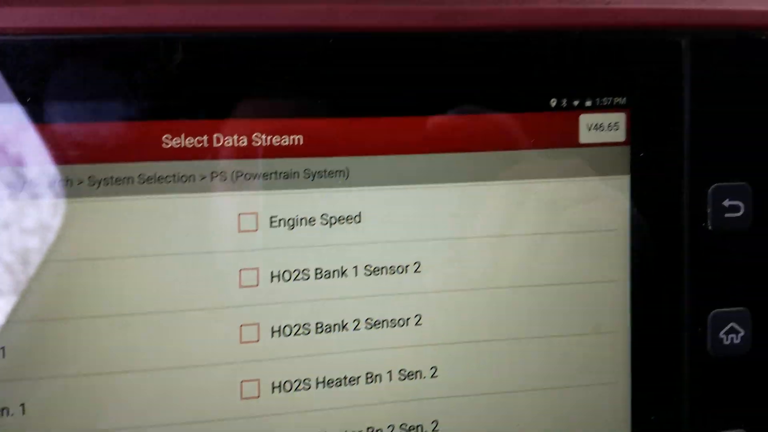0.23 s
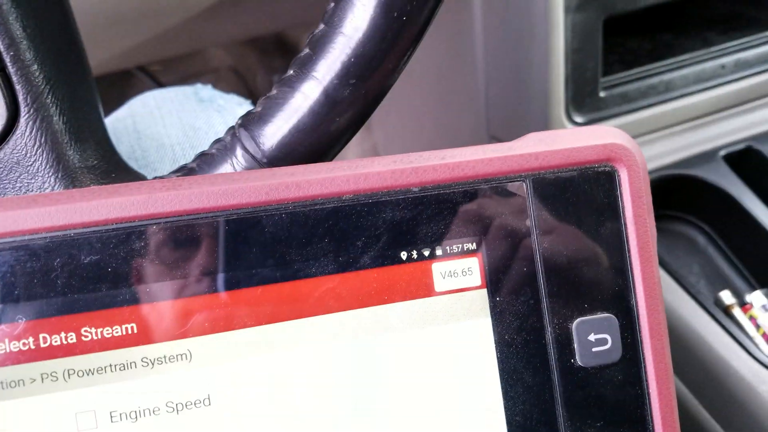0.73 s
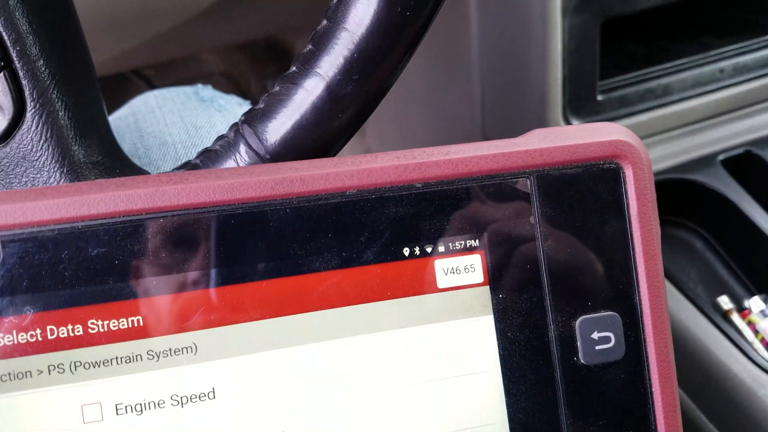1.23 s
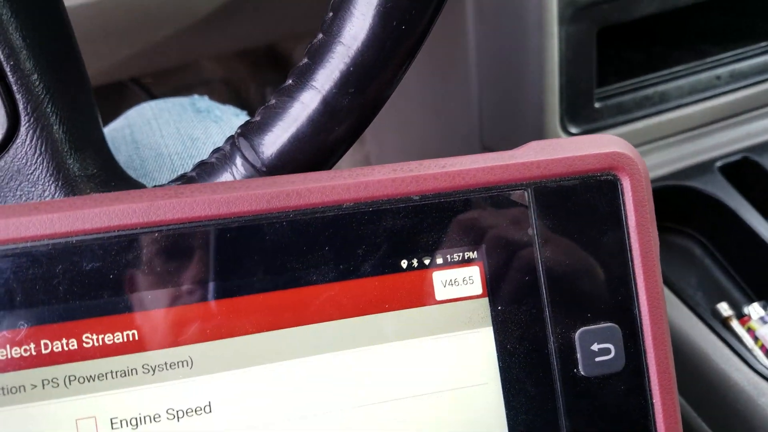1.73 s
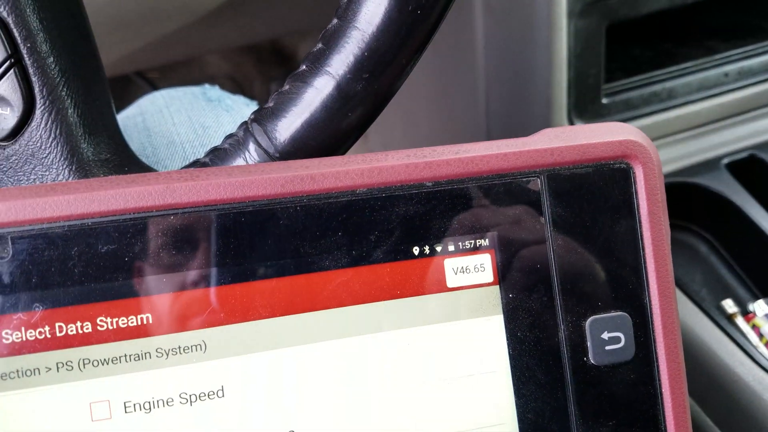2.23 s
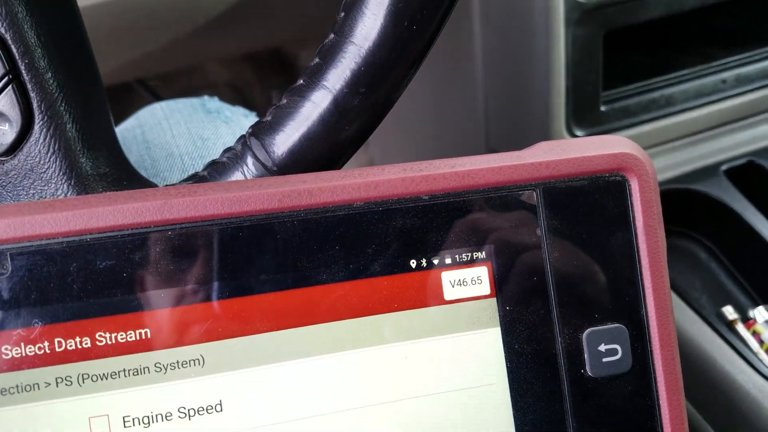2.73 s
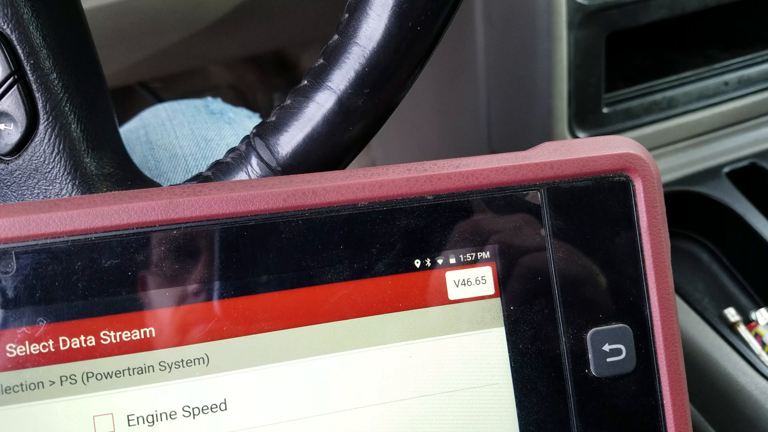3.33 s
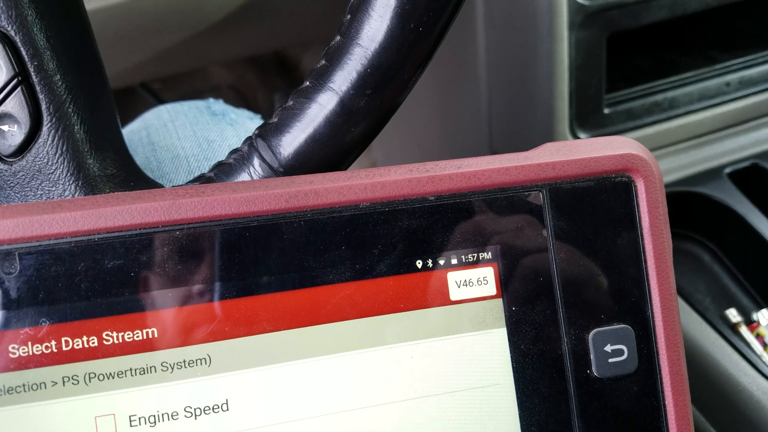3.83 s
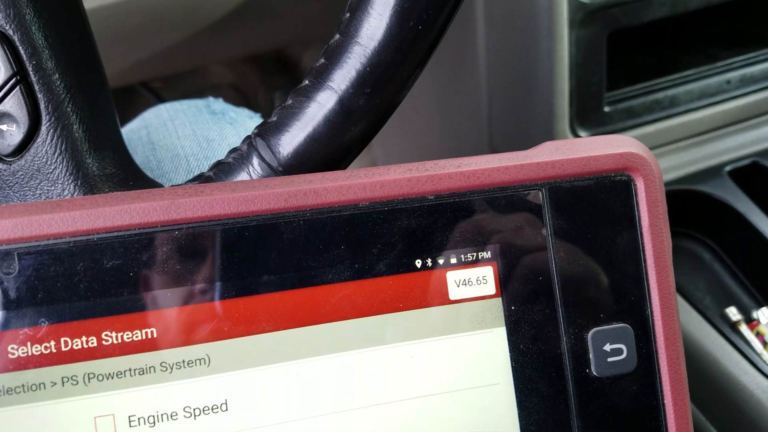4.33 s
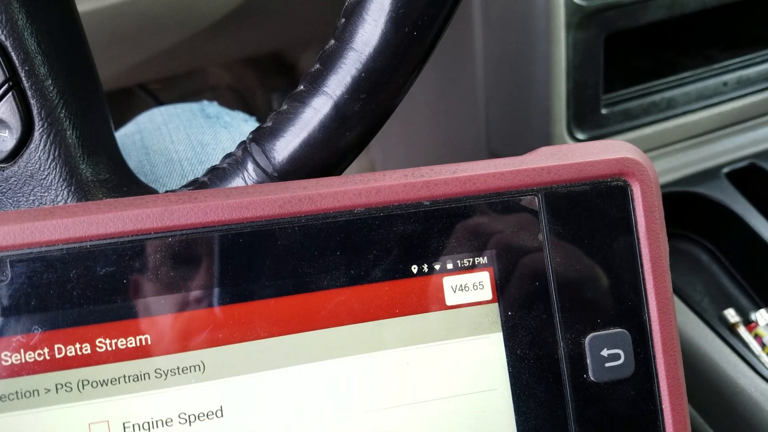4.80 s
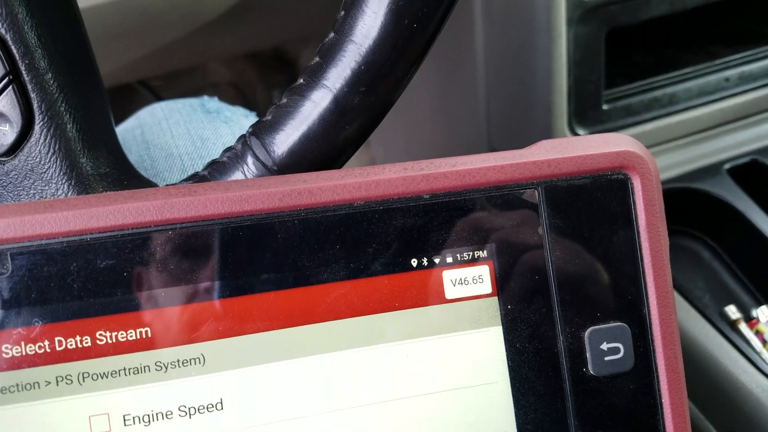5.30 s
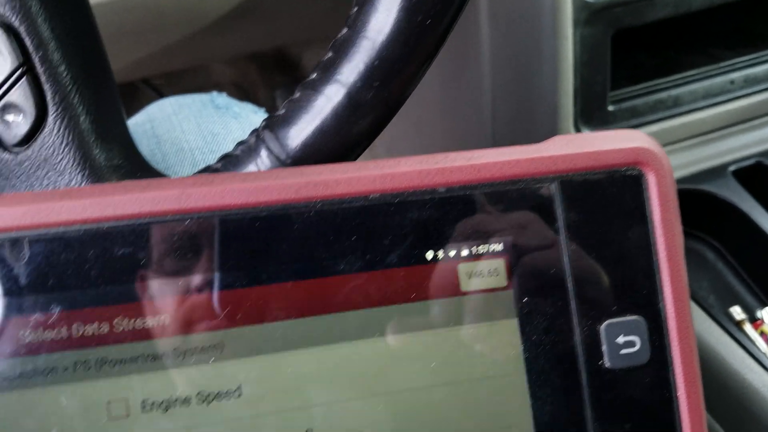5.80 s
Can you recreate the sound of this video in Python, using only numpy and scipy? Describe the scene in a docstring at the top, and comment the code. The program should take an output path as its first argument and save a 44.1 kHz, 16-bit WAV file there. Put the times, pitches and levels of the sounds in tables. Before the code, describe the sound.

A large petrol V8 idles inside a vehicle cab, heard from the driver's seat on a close stereo microphone. It is already running at 0 s, slightly fast, and settles by 0.5 s to about 645 rpm, just over five cycles a second. Unequal firings make a loud, deep, loping boom with irregular shaking, and a dull knock rings the bulkhead each cycle. Far quieter are gritty valve ticks, small metallic pings, block taps, belt whirr and rhythmic puffs of hiss. A loose panel drones briefly near 0.2, 0.55, 1.3, 2.5, 2.9 and 3.8-4.1 s, strongly at 4.5, then 5.6 and 5.9 s. Smooth hiss swells during the first 1.4 s, then at 4.2, 4.6 and 5.3 s. Harder clacks come at 2.2, 3.8, 4.47 (loudest) and 5.1 s. The idle continues to the cut near 6 s.

```python
"""Driver's seat, big petrol V8 at a rough idle near 645 rpm; two microphone ports about 13 cm apart. It opens
faster and settles within half a second; unequal firings boom with a lope, uneven burns shake. Each cycle rings
a dull bulkhead knock and covers, clip and block with grit, over whirr and puffs of hiss. A loose panel drones
from the start, now and then; smooth hiss swells early and again after 4 s. The longest of these swells begins
at 4.6 s, just after the loudest valve clack; the idle runs on to the end."""
import sys
import numpy as np
from scipy import signal
from scipy.fft import rfft, irfft, next_fast_len
from scipy.io import wavfile
from scipy.ndimage import uniform_filter1d, minimum_filter1d

SR = 44100
rng = np.random.default_rng(int(sys.argv[2]) if len(sys.argv) > 2 else 0)


def dump_mix(stems):
    """Bounce the given channels to the path in sys.argv[1] as a 16-bit WAV at rate SR."""
    frames = np.atleast_2d(stems).T  # one column per channel
    limited = np.clip(frames, -1, 1)  # hard clip at full scale
    pcm = np.round(limited * 32767).astype(np.int16)
    wavfile.write(sys.argv[1], SR, pcm)


N = 267157
T = np.arange(N) / SR

# crank speed: time_s, speed_rpm
SPEED = [(0.0, 660.4), (0.5, 639.2), (0.76, 653.0), (1.01, 638.0), (1.26, 647.7), (1.52, 637.7),
         (2.02, 648.0), (3.54, 646.2), (4.04, 653.6), (4.29, 634.9), (4.54, 652.4), (5.3, 642.9),
         (5.56, 652.5), (6.06, 643.0)]

# smooth hiss swelling under the puffs: start_s, length_s, level_db
SWELLS = [(0, 0.36, -53), (0.59, 0.35, -54.5), (1.164, 0.27, -51), (4.2, 0.43, -54), (4.577, 0.59, -49),
          (5.29, 0.37, -46.5)]
SWELL_RISE_S, SWELL_FALL_S, SWELL_FLOOR_DB = .12, .15, -72
# puffs of gas in every cycle: place_in_cycle (0-1), relative_level_db, decay_s of power
PUFFS = [(.17, 9, 0.03), (.3, 15, 0.012), (0.539, 18.5, 0.013), (.925, 19.8, 0.016)]
# slow drift of the puffs: time_s, relative_level_db
PUFF_DRIFT = [(0, -0.57), (.8, 0.23), (1.35, 1), (1.7, -0.97), (2.1, 1.5), (2.8, -0.32), (3.5, -0.7),
              (4.4, -0.21), (6.06, -0.12)]
# spectrum of the hiss: frequency_hz, relative_level_db per Hz
HISS = [(500, 0.5), (1200, 10), (2400, 2), (3500, 6), (4500, 1.5), (6800, -0.5), (7200, -4.5),
        (9000, -10.5), (11300, -1), (13500, -1.5), (16000, -2.5)]

# spectrum of the whirr of belt and gears: frequency_hz, relative_level_db per Hz
WHIRR = [(200, -0.5), (480, 2), (660, -1), (810, 0.5), (950, -0.5), (1300, -2.5), (2000, -9.5),
         (2800, -13.5), (4200, -17), (6600, -21.5), (9000, -30.5), (12000, -24.5), (16000, -24)]
# the lull before the strongest puff: place and width in the cycle (0-1), depth
LULL_PLACE, LULL_WIDTH, LULL_DB = 0.853, 0.087, -2.5
# spectrum of the tapped block: frequency_hz, relative_level_db per Hz
BLOCK = [(300, -19), (520, 1), (600, 8), (660, -6), (720, 12.5), (830, 11), (930, -4.5), (1500, 0),
         (3000, -31), (8000, -30)]
# block taps in every cycle: place_in_cycle (0-1), relative_level_db, decay_s of power
TAPS = [(.54, -0.5, 0.012), (0.8, 4.5, 0.017), (1, 3, 0.0049), (.3, -3.5, 0.04)]
# pings of a small metal part in every cycle: place_in_cycle (0-1), relative_level_db, decay_s of power
PINGS = [(0.57, 6.1, 0.0074), (0.3, 5, 0.015), (0.96, 1.1, 0.0043)]
# modes of that metal part: frequency_hz, width_hz, relative_level_db
METAL = [(3440, 57, 3.5), (3800, 93, 1.5), (4970, 40, 5.5), (5110, 74, -9), (5170, 30, 1), (5640, 160, -7)]
# valve ticks in every cycle: place_in_cycle (0-1), relative_level_db, decay_s of power
TICKS = [(.305, 0.44, 0.0028), (.55, 5.6, 0.0029), (.935, 1.8, 0.0061)]
# how much ticks, pings and taps differ from cycle to cycle
TICK_SPREAD_DB, PING_SPREAD_DB, TAP_SPREAD_DB = 1.7, 1.8, 1.2
# slow drift of the valve ticks: time_s, relative_level_db
TICK_DRIFT = [(0, 3.5), (.2, 7.5), (.5, 0.5), (1.4, 1.5), (1.65, -3), (2.4, 3.5), (3.3, 0), (4.4, 2.5),
              (5.3, -6), (6.06, 5.5)]
# modes of the valve covers: frequency_hz, width_hz, relative_level_db
COVERS = [(1882, 65, 4), (1998, 53, -4.5), (2094, 34, -4.5), (2230, 30, 2), (2270, 30, -2), (2484, 33, 1),
          (2825, 37, -5), (3150, 11, -3), (3920, 12, -3)]
# rms of the covers ahead of the ports, and their steady rattle relative to the ticks' scale
COVERS_DB, COVERS_STEADY_DB = -50.5, -5.5
# the loudest valve clacks: time_s, level_db (on a scale where COVERS_DB is zero for the ticks)
CLACKS = [(0.171, -48), (0.2423, -52.5), (2.2237, -45), (3.8134, -45.5), (4.4704, -41), (5.111, -42)]
CLACK_RISE_S, CLACK_DECAY_S = .003, .01
# stray clacks on the same scale: top level and range below it
STRAY_CLACK_DB, STRAY_RANGE_DB = -45, 3

# dull knocks in every cycle: place_in_cycle (0-1), relative_level_db
KNOCKS = [(.5, -1.5), (0.1, -9.5), (.36, -11), (1, -14.5)]
# the knocked bulkhead: it starts higher by the sag and sinks to its own pitch
BULKHEAD_HZ, BULKHEAD_SAG_HZ, BULKHEAD_SAG_S = 396, 50, .022
BULKHEAD_RISE_S, BULKHEAD_DECAY_S = 0.0082, 0.035

# strong drones from the hardest burns: time_s, panel_peak_db, cab_mode_peak_db (before drone's trims)
DRONES = [(0.019, -21, -22), (0.178, -21.5, -17.5), (0.553, -18, -24.5), (1.262, -22, -16),
          (2.463, -25.5, -13.5), (2.947, -20, -38), (3.764, -22.5, -16), (3.862, -18.5, -26.5),
          (4.087, -20.5, -25), (4.458, -17, -10.5), (5.564, -23, -11), (5.899, -20.5, -35)]
# cylinders that sometimes burn hard: place_in_cycle (0-1), chance_per_cycle (0-1)
ROUGH_CYLINDERS = [(.94, .4), (.32, .12)]
# how far such a burn stirs panel and cab (before the same trims), and its least gap to a strong drone
STIR_PANEL_DB, STIR_CAB_DB, STIR_SPREAD_DB, DRONE_GAP_S = -24.5, -20.5, 1.95, .07
# pitch of the loose panel, and its scatter from one drone to the next
PANEL_HZ, PANEL_SPREAD_HZ = 303, 4
# upper bound of the glide in the pitch term, and its time constant
PANEL_GLIDE_HZ, PANEL_GLIDE_S = 38, .03

# spectrum of the shaking from uneven burns: frequency_hz, relative_level_db per Hz
SHAKE = [(8, -21), (36, -17), (48, 1), (70, -6), (100, -3), (135, 1), (180, -1), (194, -18), (235, -25),
         (302, -12.5), (368, -28), (412, -20), (490, -45), (900, -66), (3000, -110)]

# strength of the eight cylinders in firing order: relative_level_db
CYLINDERS_DB = [-5.1, -7.2, -4.8, -3.2, -4.1, -2.5, -8.8, -9.3]
FIRST_FIRING = .093  # place of the first in the cycle (0-1)
# crank orders that boom in the cab: crank_order, rms_db (before boom's trim)
STRONG_ORDERS = [(2.5, -32), (4, -25.1), (4.5, -17.6), (5, -22.4), (5.5, -21.5), (8, -21.1), (8.5, -30.1),
                 (9.5, -26)]
# spectrum of the orders between and above them: frequency_hz, rms_db of each (before the same trim)
WEAK_ORDERS = [(32, -48), (38, -64), (72, -32.5), (85, -61), (116, -30.5), (126, -40), (143, -28),
               (172, -38.5), (185, -40.5)]
# resonances of exhaust and cab, which set the lag of each order: frequency_hz, width_hz, relative_level_db
CAB = [(40.5, 3.1, -8.4), (53.9, 9.5, -15.2), (73.6, 3.0, -5.1), (105.2, 3.0, -3.4), (126.4, 3.1, -12.8),
       (148.6, 3.0, -3.2)]

# likeness of the treble at the two ports: frequency_hz, likeness (held within 0-1)
LIKENESS = [(560, 0.5), (600, 1.2), (1000, 0.58), (1900, 0.81), (2600, 0.22), (5000, 0.21), (5600, 0)]
# balance of the ports: frequency_hz, left_minus_right_db
TILT = [(40, -.9), (90, -.3), (170, -.2), (350, -1.3), (1400, -1), (2000, -4.5), (2250, -6), (2600, -1.5),
        (5000, -4), (6500, -10), (8900, -15), (11000, -6.5), (15000, -2.5)]
# lag of the right port: frequency_hz, lag_ms
PORT_LAG = [(40, .3), (150, .26), (430, .11), (600, .3), (880, .24), (1000, .36), (1400, .385),
            (16000, .39)]
# limiter: highest sample value ahead of the band limit, and how quickly it acts
LIMITER_CEILING, LIMITER_S = .78, .008
EDGE_HZ = 15830  # upper band limit


def amp(db):
    """Decibels to gain."""
    return 10 ** (np.asarray(db) / 20)


def unit(x):
    """Scales to an rms of one."""
    return x / np.sqrt(np.mean(x ** 2) + 1e-20)


def curve(rows):
    """Joins (s, value) rows by straight lines."""
    return np.interp(T, *np.transpose(rows))


def read(points, hz):
    """Reads (Hz, value) points on a log-frequency axis."""
    f, value = np.transpose(points)
    return np.interp(np.log(hz + 1), np.log(f + 1), value)


def wander(rate_hz):
    """Smooth random drift of rms one: noise kept mostly below rate_hz."""
    size = 2 ** 19
    lowpass = 1 / (1 + (np.fft.rfftfreq(size, 1 / SR) / rate_hz) ** 4)
    return unit(irfft(rfft(rng.standard_normal(size)) * lowpass)[:N])


def causal(points, size=32768):
    """Impulse response of a passive body with this spectrum, in minimum phase."""
    log_gain = np.log(amp(read(points, abs(np.fft.fftfreq(size, 1 / SR)))))
    spectrum = np.exp(np.conj(signal.hilbert(log_gain)))
    return np.fft.ifft(spectrum).real[:size // 2]


def ringing(modes, size=8192):
    """Impulse response of a few damped modes; a wider mode dies sooner."""
    t = np.arange(size) / SR
    out = np.zeros(size)
    for hz, width, db in modes:
        out += amp(db) * width * np.exp(-np.pi * width * t) * np.sin(2 * np.pi * hz * t)
    return out


def through(x, response):
    """Sends a drive through a body; the result has an rms of one."""
    return unit(signal.fftconvolve(np.atleast_2d(x), response[None], axes=1)[:, :N])


def times_of(cycle, place):
    """Moments at which the engine passes one place in its cycle."""
    return np.interp(np.arange(place % 1, cycle[-1], 1), cycle, T)


def bursts(times, levels_db, decay_s, rise_s):
    """Power envelope of blows that rise quickly and die away."""
    power = np.zeros(N)
    t = np.arange(SR // 4) / SR
    shape = (1 - np.exp(-t / rise_s)) ** 2 * np.exp(-t / decay_s)
    for s, db in zip(times, levels_db):
        part = power[max(round(s * SR), 0):][:len(t)]
        part += amp(db) ** 2 * shape[:len(part)] / shape.max()
    return power


def each_cycle(cycle, rows, spread_db, rise_s):
    """Power envelope of blows that return every cycle, never quite equally hard."""
    power = np.zeros(N)
    for place, db, decay_s in rows:
        levels_db = db + spread_db * rng.standard_normal(size=64)
        power += bursts(times_of(cycle, place), levels_db, decay_s, rise_s)
    return power


def grit(power, grain_db):
    """Two unrelated streams of tiny impacts under a power envelope."""
    # grain size holds for 32 samples
    grains_db = grain_db * np.repeat(rng.standard_normal(N // 32 + 1), 32)[:N]
    return np.sqrt(power) * amp(grains_db) * rng.standard_normal((2, N))


def swelling():
    """Gain of the smooth hiss: each swell rises, holds and falls back to a faint floor."""
    gain = np.full(N, amp(SWELL_FLOOR_DB))
    for s, length, db in SWELLS:
        rise = np.clip((T - s) / SWELL_RISE_S, 0, 1)
        fall = np.clip((s + length - T) / SWELL_FALL_S, 0, 1)
        gain += amp(db) * rise * fall
    return gain


def hiss(cycle):
    """Gas hisses out in soft puffs locked to the cycle; a smoother hiss swells beneath."""
    gusts = each_cycle(cycle, PUFFS, spread_db=1.1, rise_s=.005)
    puffs = grit(gusts, grain_db=2.5) * amp(curve(PUFF_DRIFT))
    colour = causal(HISS)
    smooth = through(rng.standard_normal((2, N)), colour)
    return amp(-53.5) * through(puffs, colour) + swelling() * smooth


def lull(cycle):
    """Power of the steady machinery noise, which sinks briefly once a cycle."""
    away = (cycle - LULL_PLACE + .5) % 1 - .5
    return amp(LULL_DB * np.exp(-(away / LULL_WIDTH) ** 2)) ** 2


def clacks(count=16):
    """Rows (s, dB) of harder valve clacks: the loudest, and strays at random moments."""
    place, size = rng.random((count, 2)).T
    stray_s = (np.arange(count) + place) * T[-1] / count
    strays = np.transpose([stray_s, STRAY_CLACK_DB - STRAY_RANGE_DB * size])
    return np.vstack([CLACKS, strays])


def valve_covers(cycle, count=3):
    """Each tick stirs the covers' low, middle and high modes by different amounts, so its colour varies."""
    s, db = clacks().T
    clacking = bursts(s, db - COVERS_DB, CLACK_DECAY_S, CLACK_RISE_S)
    rattle = amp(COVERS_STEADY_DB) ** 2 * lull(cycle)
    drift = amp(curve(TICK_DRIFT)) ** 2
    out = np.zeros((2, N))
    for modes in np.array_split(COVERS, count):
        ticking = drift * each_cycle(cycle, TICKS, spread_db=TICK_SPREAD_DB, rise_s=0.00049)
        drive = grit(ticking + clacking + rattle, grain_db=3)
        out += signal.oaconvolve(drive, ringing(modes)[None], axes=1)[:, :N]
    return unit(out)


def clatter(cycle):
    """Valve gear ticks into the covers, pings a clip and taps the block, over the whirr of belt and gears."""
    covers = valve_covers(cycle)
    pinging = each_cycle(cycle, PINGS, spread_db=PING_SPREAD_DB, rise_s=0.0014)
    pings = through(grit(pinging, grain_db=2.5), ringing(METAL))
    tapping = each_cycle(cycle, TAPS, spread_db=TAP_SPREAD_DB, rise_s=0.0008)
    block = through(grit(tapping, grain_db=2.5), causal(BLOCK))
    whirr = through(grit(lull(cycle), grain_db=1.0), causal(WHIRR))
    return amp(COVERS_DB) * covers + amp(-60) * pings + amp(-50.5) * block + amp(-46) * whirr


def knock(cycle, level_db=-38, spread_db=3.74):
    """One heavy blow and a few soft ones each cycle ring the bulkhead, whose pitch sags as it dies."""
    blows = np.zeros(N)
    for place, db in KNOCKS:
        at = (times_of(cycle, place) * SR).astype(int)
        blows[at] += amp(db + spread_db * rng.standard_normal(size=64))[:len(at)]
    t = T[:SR // 4]
    hz = BULKHEAD_HZ + BULKHEAD_SAG_HZ * np.exp(-t / BULKHEAD_SAG_S)
    envelope = (1 - np.exp(-t / BULKHEAD_RISE_S)) ** 2 * np.exp(-t / BULKHEAD_DECAY_S)
    ring = envelope * np.sin(2 * np.pi * np.cumsum(hz) / SR)
    return amp(level_db) * through(blows, ring)[0]


def hard_burns(cycle):
    """Rows (s, panel dB, cab dB): the hardest burns, and chance ones of two cylinders that stir the panel."""
    rows = list(DRONES)
    for place, chance in ROUGH_CYLINDERS:
        lucks, spreads = rng.random(size=64), rng.standard_normal(size=64)
        for s, luck, spread in zip(times_of(cycle, place), lucks, spreads):
            gap_s = min(abs(s - row[0]) for row in DRONES)
            if luck < chance and gap_s > DRONE_GAP_S:
                extra_db = STIR_SPREAD_DB * spread
                rows.append((s, STIR_PANEL_DB + extra_db, STIR_CAB_DB + extra_db))
    return rows


def drone(cycle, width_s=0.017, low_width_s=0.0328, low_hz=168, panel_trim_db=0.5, cab_trim_db=-1.0):
    """A loose panel swells and dies, its pitch rising, together with a lower mode of the cab."""
    out = np.zeros(N)
    for s, db, low_db in hard_burns(cycle):
        near = abs(T - s) < .15
        t = T[near] - s
        start = 2 * np.pi * rng.random(2)
        hz = PANEL_HZ + PANEL_SPREAD_HZ * rng.standard_normal()
        glide = PANEL_GLIDE_HZ * rng.random()
        turns = (hz + .5 * glide * np.tanh(t / PANEL_GLIDE_S)) * t
        panel = np.sin(2 * np.pi * turns + start[0]) / np.cosh(t / width_s)
        cab = np.sin(2 * np.pi * low_hz * t + start[1]) / np.cosh(t / low_width_s)
        out[near] += amp(db + panel_trim_db) * panel + amp(low_db + cab_trim_db) * cab
    return out


def shake(cycle, count=16):
    """Each burn and each exhaust stroke departs by chance from its usual strength and moment."""
    kicks = np.zeros(N)
    at = np.flatnonzero(np.diff(np.floor(count * (cycle - FIRST_FIRING))) > 0)
    strength, slip = rng.standard_normal((len(at), 2)).T
    moved = at + (.002 * SR * slip).astype(int)  # 2 ms of random slip
    kicks[np.clip(moved, 0, N - 1)] = np.tanh(2 * strength)
    return amp(-19.0) * through(kicks, causal(SHAKE))[0]


def order_levels(orders, crank_hz):
    """Level in dB of each crank order: a few boom, the others lie on one gentle spectrum."""
    strong = {round(2 * order): db for order, db in STRONG_ORDERS}
    levels = [strong.get(round(2 * order), read(WEAK_ORDERS, order * crank_hz)) for order in orders]
    return np.array(levels)


def boom(cycle, count=34, trim_db=0.05):
    """Eight unequal firings a cycle: their orders reach the ear with the lag of the cab's resonances."""
    # multiples of the cycle rate, each half a crank order
    multiple = np.arange(round(2 * STRONG_ORDERS[0][0]), count + 1)
    cycle_hz = cycle[-1] / T[-1]
    levels_db = order_levels(multiple / 2, 2 * cycle_hz)
    hz = multiple * cycle_hz
    places = FIRST_FIRING + np.arange(len(CYLINDERS_DB)) / len(CYLINDERS_DB)
    firings = np.exp(-2j * np.pi * np.outer(multiple, places)) @ amp(CYLINDERS_DB)
    cab = sum(amp(db) / (1 + 1j * (hz ** 2 - f ** 2) / (hz * width)) for f, width, db in CAB)
    lags = np.angle(-firings * cab)
    # the crank never turns quite evenly
    turns = cycle + .0009 * wander(rate_hz=9)
    out = np.zeros(N)
    for k, db, lag in zip(multiple, levels_db, lags):
        out += np.sqrt(2) * amp(db) * np.cos(2 * np.pi * k * turns + lag)
    return amp(trim_db) * out


def ports(direct, diffuse):
    """Sound reaches the left port first; the diffuse treble is less alike at the two ports than the lows."""
    size = next_fast_len(N + 1000)
    hz = np.fft.rfftfreq(size, 1 / SR)
    low, (a, b) = rfft(direct, size), rfft(diffuse, size)
    same = np.clip(read(LIKENESS, hz), 0, 1)
    tilt = amp(read(TILT, hz) / 2)  # half the difference to each port
    lag = np.exp(-2j * np.pi * hz * read(PORT_LAG, hz) / 1000)
    left = low + a
    right = (low + same * a + np.sqrt(1 - same ** 2) * b) * lag
    return irfft(np.array([left * tilt, right / tilt]), size)[:, :N]


def scene():
    """One four-stroke cycle, two turns of the crank, drives everything."""
    cycle = np.cumsum(curve(SPEED)) / (120 * SR)  # cycles run so far
    low = boom(cycle) + shake(cycle) + drone(cycle) + knock(cycle)
    fade = signal.windows.tukey(N, .002)
    return ports(low * fade, clatter(cycle) + hiss(cycle))


def record(dry):
    """The recorder's limiter eases the tallest peaks down; then its band limit."""
    size = round(LIMITER_S * SR)
    wanted = LIMITER_CEILING / np.maximum(abs(dry).max(0), LIMITER_CEILING)
    gain = minimum_filter1d(wanted, 2 * size)
    limited = dry * uniform_filter1d(uniform_filter1d(gain, size), size)
    band = signal.firwin(511, EDGE_HZ, window=("kaiser", 9), fs=SR)
    return signal.oaconvolve(limited, band[None], "same")


dry = scene()
out = record(dry)
dump_mix(out)
```